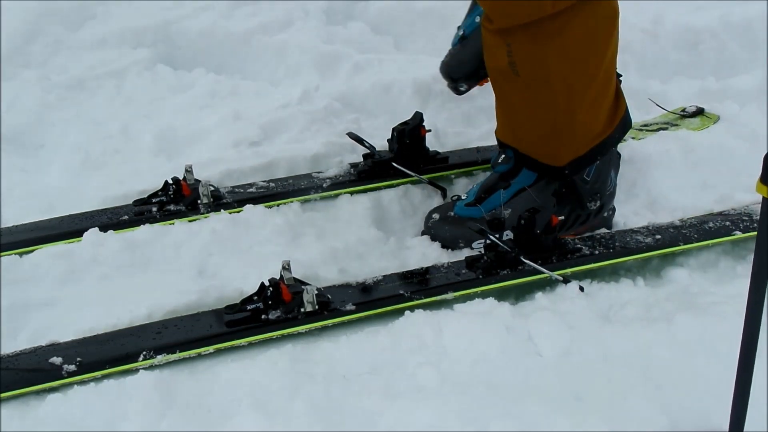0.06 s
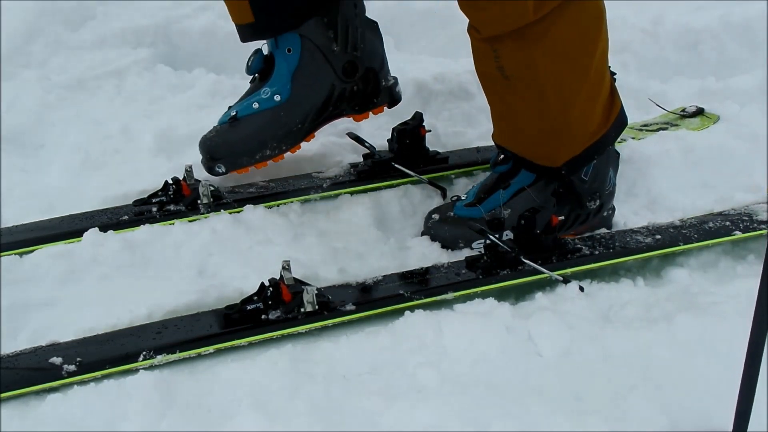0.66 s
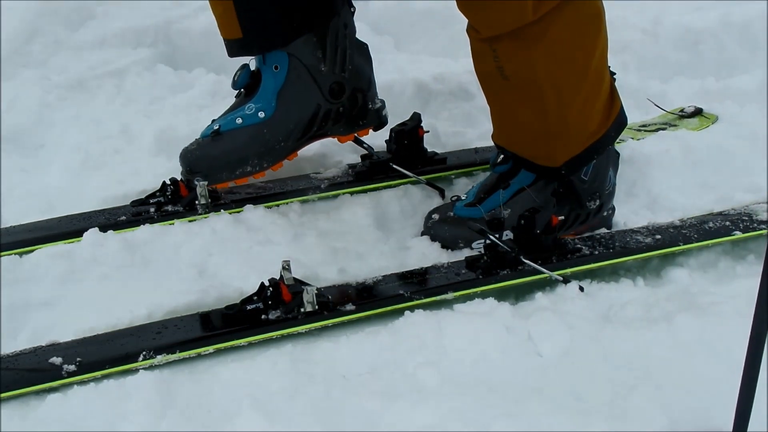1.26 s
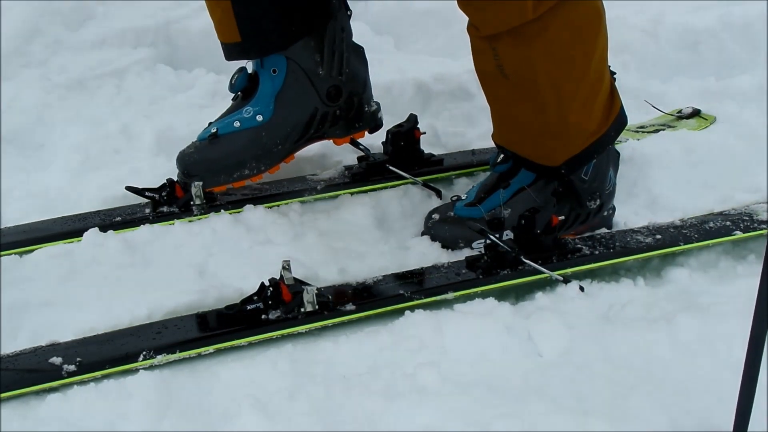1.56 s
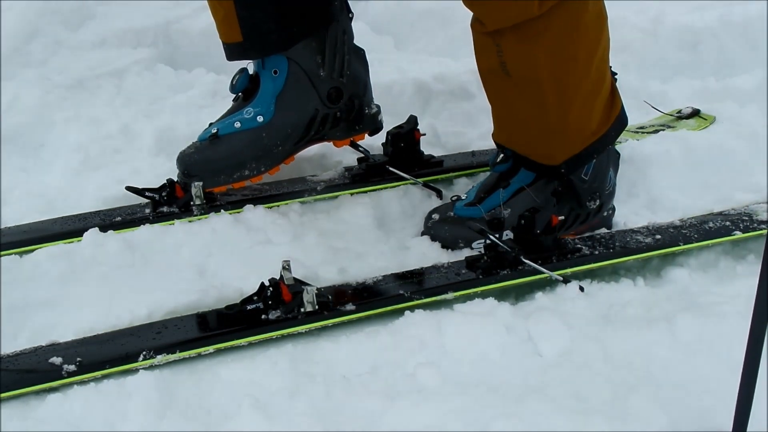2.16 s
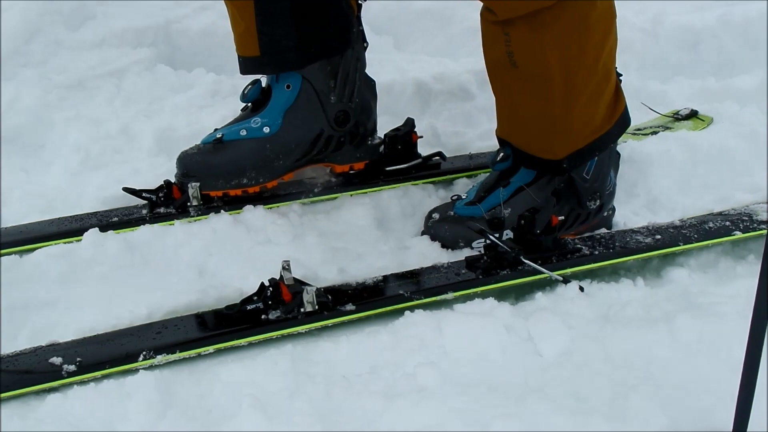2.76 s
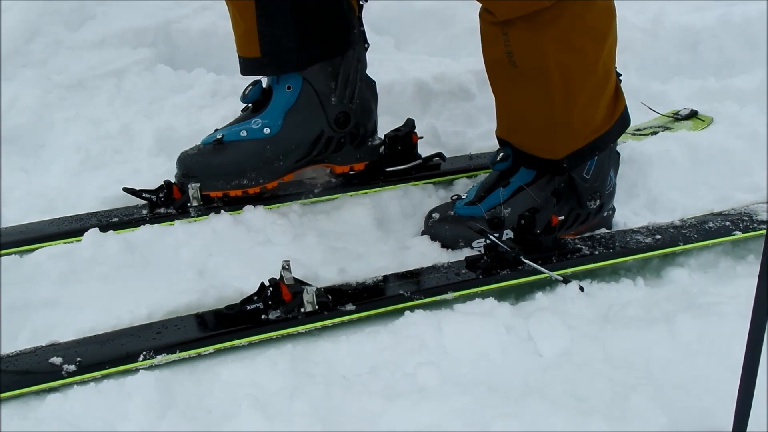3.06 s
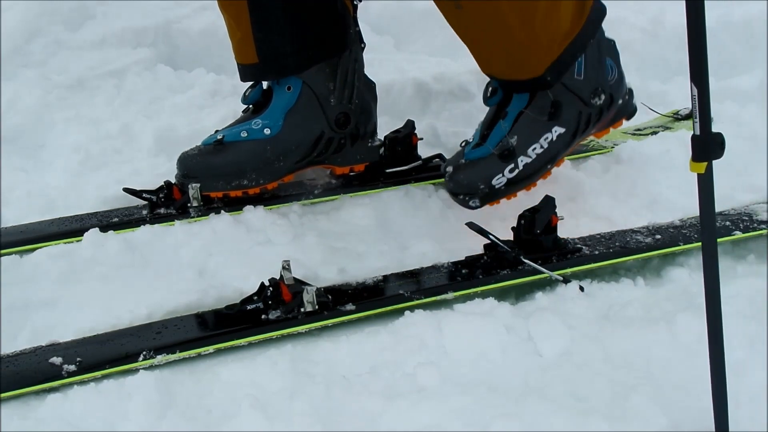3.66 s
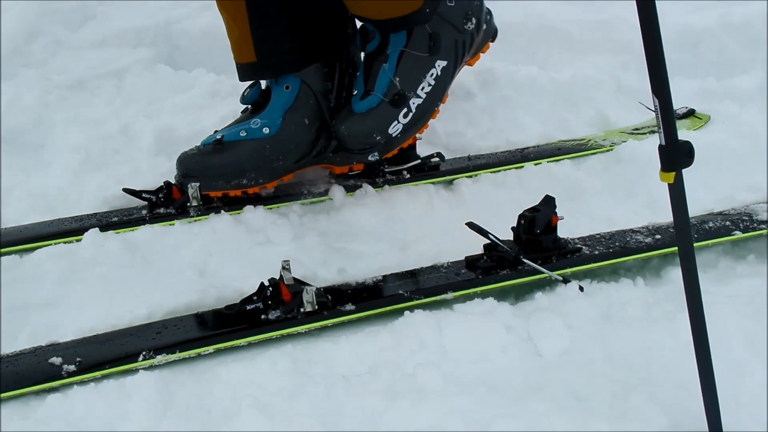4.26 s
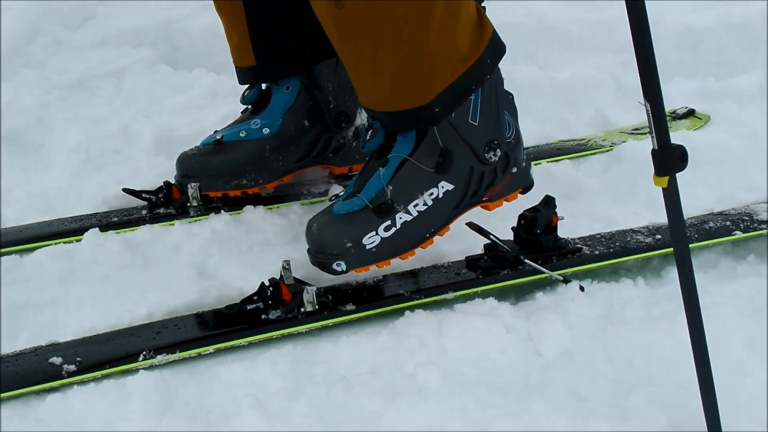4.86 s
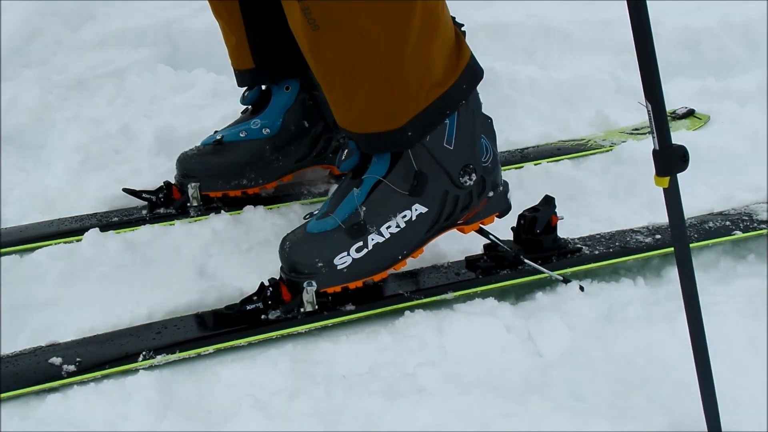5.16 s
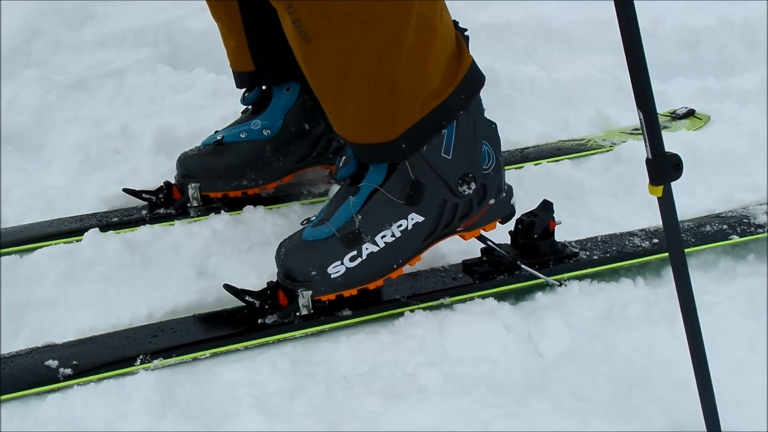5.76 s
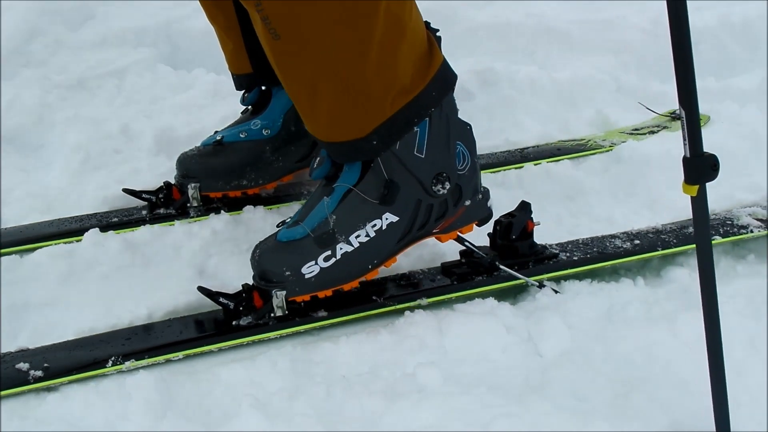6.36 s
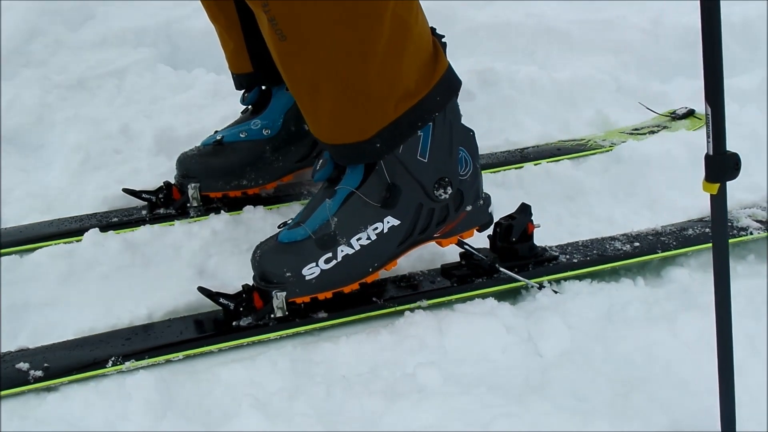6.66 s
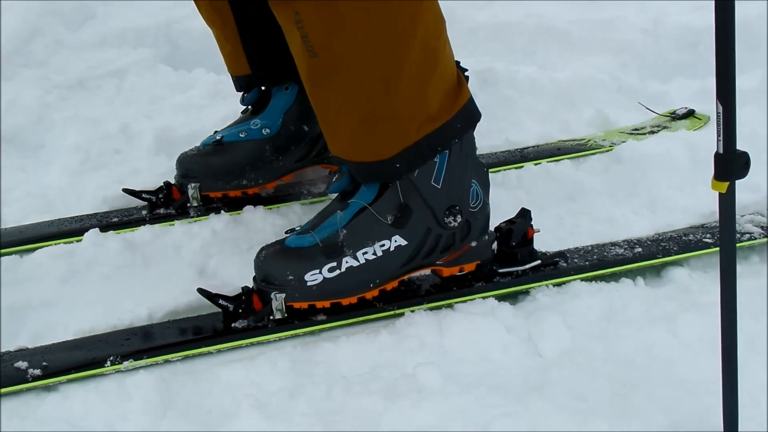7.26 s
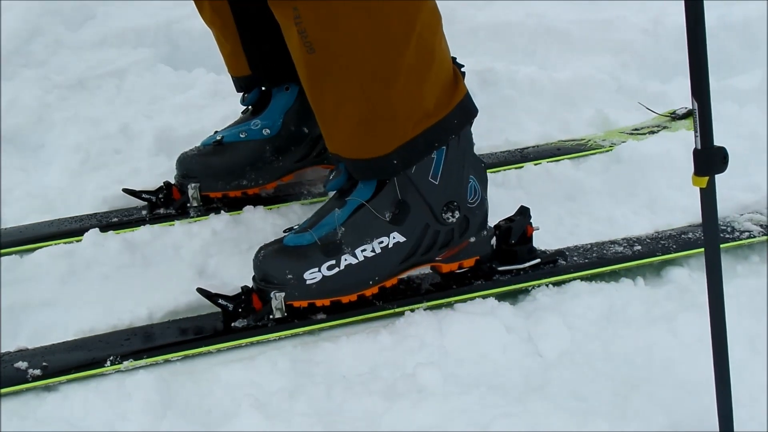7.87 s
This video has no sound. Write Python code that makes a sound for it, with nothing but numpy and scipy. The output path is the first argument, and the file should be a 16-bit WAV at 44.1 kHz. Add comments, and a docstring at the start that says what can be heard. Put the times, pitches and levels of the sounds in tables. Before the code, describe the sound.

Close by in still open air, a ski boot ticks against a metal binding, the toe jaws snap shut, and the heel slams home with a thud through the ski. The other boot knocks twice against that binding, then clicks into its own, toe first and heel after. Packed snow creaks softly under the shifting weight and nylon trousers swish throughout.

```python
"""Two touring bindings snap shut as a skier steps in, close by on packed snow in open air.
Toe jaws close and heel pieces slam home, ringing metal, boot shell and ski; in between,
one boot knocks twice against the other binding. Snow creaks in stick-slip under the
shifting weight, and nylon trouser legs rub and swish."""
import sys
import numpy as np
from scipy import signal
from scipy.fft import rfft, irfft
from scipy.io import wavfile
from scipy.ndimage import uniform_filter1d

SR = 44100
rng = np.random.default_rng(int(sys.argv[2]) if len(sys.argv) > 2 else 0)


def generate_wav(sig):
    """Save sig (samples, or channels by samples) to the path in sys.argv[1] as 16-bit PCM at SR."""
    pcm = np.round(np.clip(np.atleast_2d(sig).T, -1, 1) * 32767).astype(np.int16)
    wavfile.write(sys.argv[1], SR, pcm)


N = 352800
HIT_SAMPLES = SR // 3
AGE_S, TIME_S = np.arange(HIT_SAMPLES) / SR, np.arange(N) / SR

# weight on the snow: start_s, end_s, crush_db, creak_db, slips_per_s
SNOW_PUSHES = [(0, 1.11, -69, -64.5, 48), (0.259, 0.42, -64, -56, 49.4), (0.454, 0.67, -63.5, -56.5, 52),
               (0.85, 0.998, -68, -63, 36), (1.219, 1.37, -61.5, -60.5, 50), (1.736, 2.079, -89, -67, 32),
               (2.101, 2.45, -68, -58.5, 41), (2.501, 2.797, -60, -60, 55),
               (3.173, 3.482, -64.5, -62.5, 50), (3.554, 3.642, -56, -59, 65), (3.699, 4.057, -63, -59, 70),
               (4.153, 4.625, -72.5, -64, 52), (4.698, 4.96, -65, -64.5, 50), (4.994, 5.1, -62, -62.5, 58),
               (5.148, 5.349, -57.5, -60, 57), (5.5258, 5.585, -63, -56, 50), (6.099, 6.39, -73, -63, 32),
               (6.518, 6.581, -73, -67.5, 35), (6.644, 6.734, -70.5, -60.5, 35),
               (6.868, 7.21, -65.5, -60.5, 50), (7.3364, 7.47, -68, -58.5, 34),
               (7.671, 8.0, -68, -54.5, 37)]
# leg swings: fastest_s, level_db, rise_db_per_s, fall_db_per_s
LEG_SWINGS = [(0.152, -51, 14, 19), (0.55, -57.5, 20, 15.5), (1.33, -58, 22, 69),
              (2.699, -55.5, 23.5, 34.5), (3.979, -37, 34, 110.5), (4.28, -56, 41, 12), (4.85, -62, 21, 21),
              (5.3, -60, 24, 70), (5.58, -59.5, 61, 44.5), (6.4, -61.5, 29, 27), (6.72, -57, 28.5, 36),
              (7.049, -50.5, 73, 34), (7.802, -53.5, 37.5, 6)]
# toe pin and buckle touches: start_s, level_db, body_relative_db, cutoff_hz
LIGHT_TOUCHES = [(0.9425, -33.5, -12.5, 12100), (0.993, -37, -13, 3000), (1.044, -29.5, -12.5, 2190),
                 (1.217, -34.5, -8, 3940), (1.238, -25, -18, 11000), (1.3099, -33, -10, 3500),
                 (1.3332, -37, -5.5, 10000), (1.3565, -35.5, -21.5, 12000), (1.58, -39.5, -14, 2960),
                 (1.7804, -43, -28, 9000), (2.0726, -39.5, -18, 4000), (5.169, -38, -15, 14000),
                 (5.1946, -32.5, -9.5, 9000), (5.441, -35, -24, 3470), (5.6209, -36, -9.5, 10000),
                 (5.843, -38.5, -11.5, 3480), (6.725, -36.5, -17, 12050), (6.787, -28.5, -28, 11700),
                 (7.3388, -40, -21, 12000), (7.567, -40.5, -8.5, 3000), (7.813, -37.5, -11, 10100)]
# blows on boot and binding: start_s, thud_db, knock_db, clack_db, snap_db, t60_s, rebound_s, metal_hz
BINDING_BLOWS = [(1.4189, -41, -37, -13.5, -13, 0.012, 0.0059, 4960),
                 (1.4265, -23.5, -17.5, -12.5, -7.5, 0.027, .012, 2400),
                 (1.4366, -19, -26, -20, -20, 0.025, .017, 2414),
                 (2.6093, -20.5, -34.5, -39, -32, 0.12, .02, 3300),
                 (2.6141, -29, -25, -19.5, -25.5, .03, 0.018, 4240),
                 (2.6802, -29, -36.5, -32.5, -27, 0.047, .016, 3300),
                 (2.701, -11, -20.5, -10.5, -13, 0.031, .018, 3270),
                 (2.708, -22, -30, -30.5, -26.5, 0.078, .013, 3346),
                 (4.0438, -6.5, -8, -18, -18, 0.013, 0.0056, 2610),
                 (4.0772, -52, -60, -37, -19.5, 0.014, 0.0098, 4500),
                 (4.2901, -12.5, -22.5, -21, -8, 0.0094, .018, 4300),
                 (4.2954, -28, -21, -19, -20, 0.016, 0.021, 2000),
                 (5.2195, -43, -37.5, -41, -29, .01, 0.0063, 4500),
                 (5.647, -23, -14.5, -7.5, -4, .024, .0095, 5620),
                 (7.056, -28.5, -27, -25.5, -23.5, 0.042, 0.0094, 3300),
                 (7.0916, -41, -15.5, -7.5, -8, 0.019, 0.017, 3450),
                 (7.1002, -15.5, -26.5, -20.5, -17, 0.031, 0.022, 3300)]
# boot grinding on metal: start_s, end_s, level_db
BOOT_SCRAPES = [(2.628, 2.688, -51.5), (4.008, 4.09, -35.5), (4.289, 4.338, -38.5), (5.644, 5.645, -29),
                (5.86, 5.909, -58.5), (7.057, 7.099, -36)]
# jolts to the sprung steel brake arms: start_s, level_db
BRAKE_JOLTS = [(1.428, -42.5), (2.681, -52), (2.7035, -28), (4.045, -39.5), (4.078, -40.5), (4.2896, -30.5)]
# jolts to the whole ski: start_s, level_db, t60_ratio
SKI_JOLTS = [(2.611, -24.5, 0.44), (2.706, -21, 0.51), (4.045, -46, 1.1), (5.648, -39.5, 0.54),
             (7.06, -32.5, 1.6), (7.1, -27, 1.04)]
# boot toe juddering over the binding: time_s, slips_per_s, level_db
JUDDER_CURVE = [(4.96, 50, -73), (5.053, 56, -63), (5.13, 66, -53), (5.18, 82, -63), (5.25, 64, -57.5),
                (5.31, 48, -53.5), (5.389, 38, -60)]

# ski thud: pitch_hz, level_db, t60_s
THUD_MODES = [(158, -3.5, 0.032), (176, -3.5, 0.039), (237, 1.5, 0.028), (266, -4.5, 0.026),
              (315, -0.5, 0.032), (452.4, -1.5, 0.04)]
# brake arms: pitch_hz, level_db, t60_s
BRAKE_MODES = [(5240, -6, .07), (5600, -18, .13), (8120, -7, .12), (9860, -5, .13), (11400, -13, .12),
               (12240, -4, .16), (13400, -19, .15)]
# full ski length: pitch_hz, level_db, t60_s
BOOM_MODES = [(58, -9, 0.21), (85.5, -14.5, 0.048), (106, -9.5, 0.068), (146, 3, 0.17)]
# boot and ski rung by slips: centre_hz, width_hz, gain_db
CREAK_BANDS = [(266, 160, -5.5), (520, 220, -1.5), (876, 248, 2), (1360, 310, -1.5), (1800, 730, -3),
               (2800, 940, -8), (3330, 510, -8)]
# plastic boot shell: centre_hz, width_hz, gain_db
SHELL_BANDS = [(424, 440, -6), (600, 130, 2.5), (740, 83, 1), (828, 90, 2.5), (996, 178, -0.5),
               (1294, 83, -5), (1490, 190, -6.5)]
# binding metal: centre_hz, width_hz, gain_db
CLACK_BANDS = [(1783, 58, 0.5), (2240, 220, 1), (2607, 170, -1), (3282, 320, -1), (4070, 240, -0.5),
               (4420, 330, 0), (5020, 1300, -3), (6550, 900, -1)]
# binding's bright snap: centre_hz, width_hz, gain_db
SNAP_BANDS = [(6635, 470, -7.5), (8110, 440, 0.5), (8440, 530, 2.5), (10100, 1900, -3.5),
              (11150, 1100, 6.5), (12700, 4320, 6), (14700, 5100, -1.5)]
# toe piece: centre_hz, width_hz, gain_db
TOE_BANDS = [(870, 250, 1), (1800, 120, -2), (2830, 340, -8), (3330, 260, -3.5), (4670, 640, -9.5),
             (5760, 270, -14), (7000, 1300, -13.5)]

# snow crush: frequency_hz, density_db
CRUSH_SPECTRUM = [(25, -12), (60, -9.5), (110, -2.5), (280, -3), (480, -5.5), (800, -14.5), (2000, -23.5)]
# rubbing nylon: frequency_hz, density_db
NYLON_SPECTRUM = [(100, -26), (900, -14.5), (3000, -11), (6000, -10), (10000, -9), (11500, -5.5),
                  (12900, -2.5), (14300, -6), (16000, -11.5)]
# light contact: frequency_hz, density_db
TICK_SPECTRUM = [(800, -7.5), (1500, -6), (2400, 0), (3600, -6), (5500, -5.5), (9500, -9.5), (13000, -5.5),
                 (16000, -13.5)]
# still air: frequency_hz, density_db
AIR_SPECTRUM = [(20, -0.5), (100, -5), (500, -3), (1500, -14), (5000, -16), (16000, -24)]


def from_db(db):
    """Decibels to gain."""
    return 10 ** (np.asarray(db) / 20)


def unit_rms(x):
    """Scale to rms 1."""
    return x / np.sqrt(np.mean(x ** 2) + 1e-20)


def add(out, start_s, sound):
    """Mix sound into out at start_s."""
    at = max(0, int(round(start_s * SR)))
    out[at:at + len(sound)] += sound[:max(0, N - at)]


def decay(t60_s):
    """Exponential fall from 1."""
    return from_db(-60 * AGE_S / t60_s)


def butter(x, cutoff_hz, kind):
    """Second-order Butterworth filter."""
    return signal.sosfilt(signal.butter(2, cutoff_hz, kind, fs=SR, output="sos"), x)


def noise(spectrum, samples):
    """Shaped noise, rms 1."""
    hz, db = np.transpose(spectrum)
    bins_hz = np.maximum(np.fft.rfftfreq(samples, 1 / SR), 1)
    gains = from_db(np.interp(np.log(bins_hz), np.log(hz), db))
    return unit_rms(irfft(rfft(rng.standard_normal(samples)) * gains, samples))


def swell(start_s, end_s, db, rise_db_per_s, fall_db_per_s):
    """Gain: rises to db at start_s, holds to end_s, falls."""
    before_db = rise_db_per_s * np.maximum(start_s - TIME_S, 0)
    after_db = fall_db_per_s * np.maximum(TIME_S - end_s, 0)
    return from_db(db - np.minimum(before_db + after_db, 100))


def power_sum_db(gains, rest_db):
    """Overlapping movements over a resting level."""
    return 10 * np.log10(sum(gain ** 2 for gain in gains) + from_db(rest_db) ** 2)


def resonate(x, bands, detune=0):
    """Parallel resonators of alternating sign, optionally detuned at random."""
    out = 0
    for k, (hz, width_hz, db) in enumerate(bands):
        r = np.exp(-np.pi * width_hz / SR)
        angle = 2 * np.pi * hz * (1 + detune * rng.standard_normal()) / SR
        ring = signal.lfilter([1 - r * r, 0, r * r - 1], [1, -2 * r * np.cos(angle), r * r], x)
        out = out + (-1) ** k * from_db(db) * ring
    return out


def rub(force, bands):
    """Rough friction through resonances; rms follows force."""
    friction = force * rng.standard_normal(len(force))
    return unit_rms(resonate(friction, bands)) * np.sqrt(np.mean(force ** 2))


def slip_force(times_s, levels_db, t60_s):
    """Friction pulses: each slip rises fast and dies."""
    force = np.zeros(N)
    pulse = decay(t60_s) * (1 - np.exp(-AGE_S / 0.0025))
    for start_s, db in zip(times_s, levels_db):
        add(force, start_s, from_db(db) * pulse / pulse.max())
    return force


def slip_run(start_s, end_s, db, slips_per_s, lift_db=6.5, spread_db=2.1):
    """Nearly even slips during one push; rows of time_s, level_db."""
    due_s = np.arange(start_s, end_s, 1 / slips_per_s)
    lateness, strength = rng.standard_normal((len(due_s), 2)).T
    return np.column_stack([due_s + 0.1 * lateness / slips_per_s, db + lift_db + spread_db * strength])


def snow(load_db_per_s=149.5, ease_db_per_s=120.5, pivot_start_s=5.2, pivot_end_s=7.5):
    """Loaded snow yields in stick-slip steps that ring boot and ski, over a dull crush."""
    crushes, creaks, slips = [], [], []
    for start_s, end_s, crush_db, creak_db, slips_per_s in SNOW_PUSHES:
        crushes.append(swell(start_s, end_s, crush_db, load_db_per_s, ease_db_per_s))
        creaks.append(swell(start_s, end_s, creak_db, load_db_per_s, ease_db_per_s))
        slips.append(slip_run(start_s, end_s, creak_db, slips_per_s))
    force = slip_force(*np.vstack(slips).T, t60_s=0.012)
    between_slips = from_db(power_sum_db(creaks, rest_db=-71) - 6)
    creak = rub(from_db(-1.5) * force + between_slips, CREAK_BANDS)
    boot_hollow = from_db(-6.5) * rub(force, [(940, 170, 0)])
    crush = from_db(power_sum_db(crushes, rest_db=-75) + 1.5) * noise(CRUSH_SPECTRUM, N)
    # second boot pivots on its pins, passing slips to the binding
    clamped = (TIME_S > pivot_start_s) & (TIME_S < pivot_end_s)
    toe_ring = from_db(-0.5) * rub(force * clamped, TOE_BANDS)
    return creak + boot_hollow + toe_ring + crush


def trousers():
    """Woven nylon rubs on itself as the legs swing: high, grainy hiss."""
    swings = (swell(at_s, at_s, db, *slopes) for at_s, db, *slopes in LEG_SWINGS)
    swish_db = power_sum_db(swings, rest_db=-76)
    grain_db = 1.7 * unit_rms(uniform_filter1d(rng.standard_normal(N), size=150))
    return from_db(swish_db - 0.5) * unit_rms(noise(NYLON_SPECTRUM, N) * from_db(grain_db))


def chatter(bands, t60_s, first_db):
    """A hard contact, then dense dying micro-impacts, ring a part."""
    fall = decay(t60_s)
    contacts = rng.standard_normal(HIT_SAMPLES) * fall
    contacts[0] += from_db(first_db)
    ringing = resonate(contacts, bands, detune=0.015)  # each blow lands elsewhere
    return unit_rms(ringing) * np.sqrt(np.mean(fall ** 2))


def struck(modes, spread_db, t60_ratio=1):
    """Decaying sine modes, each struck with random strength."""
    pitches_hz, db, t60s_s = np.transpose(modes)
    gains = from_db(db + spread_db * rng.standard_normal(len(db))) * (-1) ** np.arange(len(db))
    gains /= np.sqrt(np.sum(gains ** 2) / 2)
    return sum(gain * np.sin(2 * np.pi * hz * AGE_S) * decay(t60_s * t60_ratio)
               for gain, hz, t60_s in zip(gains, pitches_hz, t60s_s))


def ticks():
    """Pins and buckles touch: a short crack over a little boot and ski."""
    out = np.zeros(N)
    for start_s, db, body_db, cutoff_hz in LIGHT_TOUCHES:
        shell = chatter(SHELL_BANDS, t60_s=0.005, first_db=18.5)
        ski = from_db(-4.5) * struck(THUD_MODES, spread_db=6.5)
        crack = from_db(db - 6) * noise(TICK_SPECTRUM, HIT_SAMPLES) * decay(0.021)
        add(out, start_s, butter(crack, cutoff_hz, "low"))
        add(out, start_s, from_db(db + body_db + 5) * (shell + ski))
    return out


def blow(thud_db, knock_db, clack_db, snap_db, t60_s, metal_hz, fall_db_per_octave=5):
    """One contact sounds ski, shell and metal; the clack weakens away from metal_hz."""
    metal_bands = [(hz, width_hz, db - fall_db_per_octave * abs(np.log2(hz / metal_hz)))
                   for hz, width_hz, db in CLACK_BANDS]
    t60_ratio = np.clip(t60_s / 0.03, 0.6, 1.3)
    return (from_db(thud_db - 1) * struck(THUD_MODES, spread_db=2, t60_ratio=t60_ratio)
            + from_db(knock_db + 1) * chatter(SHELL_BANDS, t60_s, first_db=30.5)
            + from_db(clack_db) * chatter(metal_bands, t60_s, first_db=16)
            + from_db(snap_db) * chatter(SNAP_BANDS, t60_s, first_db=13))


def bindings(rebound_db=-17.5, rebound_t60_s=0.018):
    """Blows with one rebound each, boot scrapes, ringing brake arms, booming ski."""
    out = np.zeros(N)
    for start_s, *levels_db, t60_s, rebound_s, metal_hz in BINDING_BLOWS:
        add(out, start_s, blow(*levels_db, t60_s, metal_hz))
        add(out, start_s + rebound_s, from_db(rebound_db) * blow(*levels_db, rebound_t60_s, metal_hz))
    for start_s, end_s, db in BOOT_SCRAPES:
        force = from_db(db) * np.sqrt(np.hanning(int((end_s - start_s) * SR)))
        for bands, part_db in (SNAP_BANDS, 0), (CLACK_BANDS, -3.5), (SHELL_BANDS, -7):
            add(out, start_s, from_db(part_db) * rub(force, bands))
    for start_s, db in BRAKE_JOLTS:
        add(out, start_s, from_db(db) * struck(BRAKE_MODES, spread_db=2))
    for start_s, db, t60_ratio in SKI_JOLTS:
        add(out, start_s, from_db(db) * struck(BOOM_MODES, spread_db=1, t60_ratio=t60_ratio))
    return out


def toe_judder():
    """Plastic sticks and slips on steel, quickening then slowing."""
    knots_s, slips_per_s, db = np.transpose(JUDDER_CURVE)
    span_s = np.arange(knots_s[0], knots_s[-1], 1 / SR)
    slip_count = np.floor(np.cumsum(np.interp(span_s, knots_s, slips_per_s)) / SR)
    times_s = span_s[np.flatnonzero(np.diff(slip_count))]
    levels_db = np.interp(times_s, knots_s, db) + 7.5
    return rub(slip_force(times_s, levels_db, t60_s=0.0056), TOE_BANDS)


def snowfield(x, level_db, t60_s):
    """Snow scatters back a faint, dull tail."""
    scatter = butter(rng.standard_normal(HIT_SAMPLES), 1500, "low")
    tail = scatter * decay(t60_s) * (AGE_S > 0.008)
    tail /= np.sqrt(np.sum(tail ** 2))
    return x + from_db(level_db) * signal.fftconvolve(x, tail)[:N]


def scene():
    """Hardware, snow and cloth over still air; mono."""
    hardware = snowfield(bindings() + ticks() + toe_judder(), level_db=-35, t60_s=0.15)
    hardware = butter(hardware, 62, "high")  # the hardware sounds are thinned below about 60 Hz
    air = from_db(-72.5) * noise(AIR_SPECTRUM, N)
    return (hardware + snow() + trousers() + air)[None]


def record(dry, ceiling=0.85, cutoff_hz=15900):
    """Soft clip, then steep low-pass."""
    rounded = ceiling * np.tanh(dry / ceiling)
    return signal.sosfilt(signal.ellip(10, 0.1, 80, cutoff_hz, fs=SR, output="sos"), rounded)


dry = scene()
out = record(dry)
generate_wav(out)
```